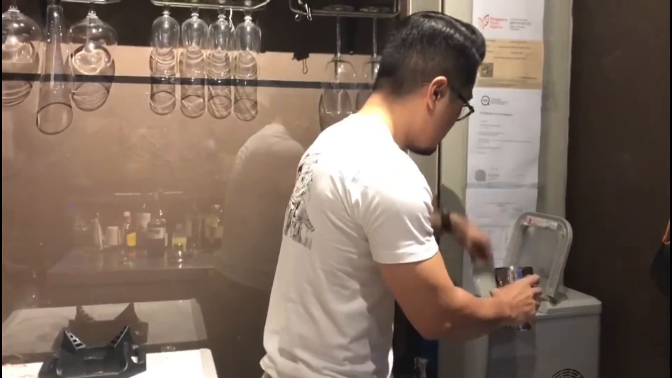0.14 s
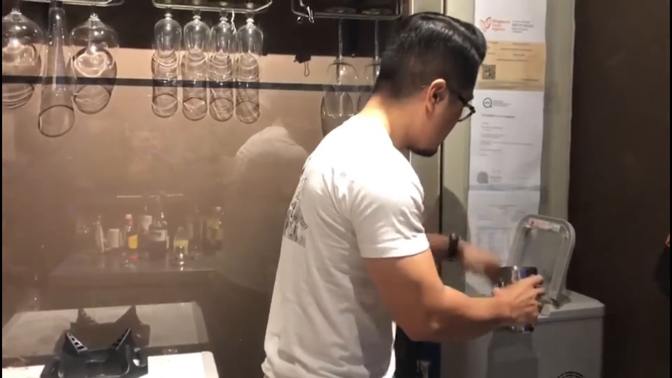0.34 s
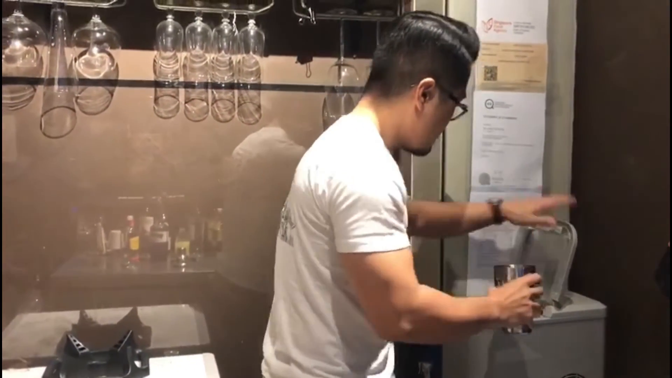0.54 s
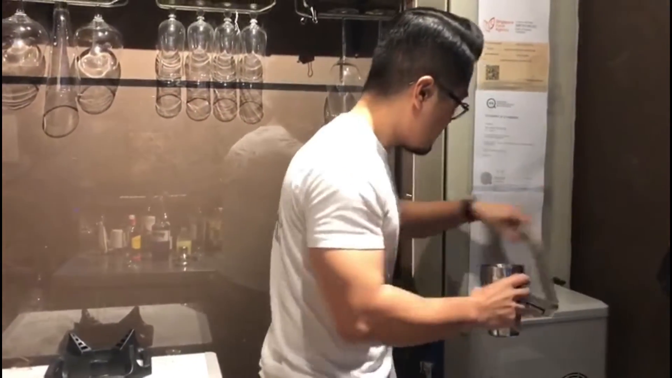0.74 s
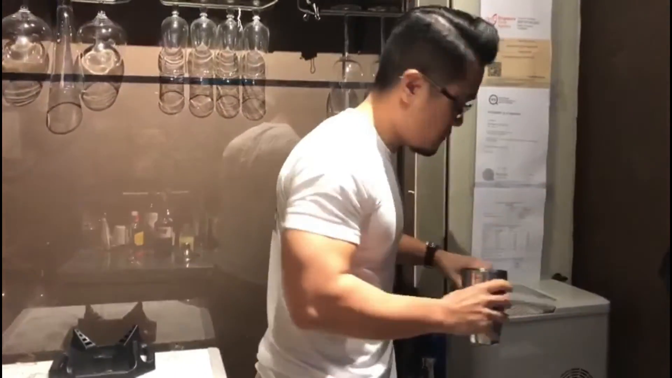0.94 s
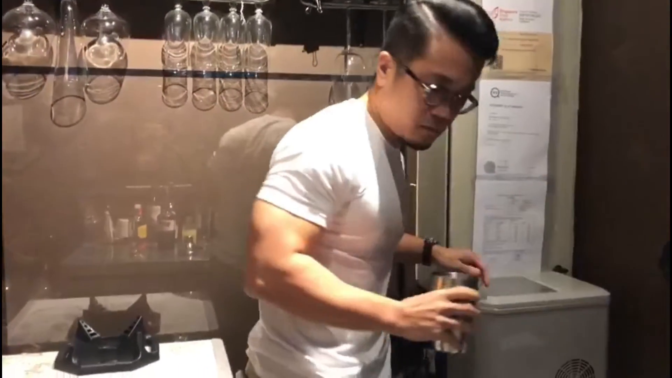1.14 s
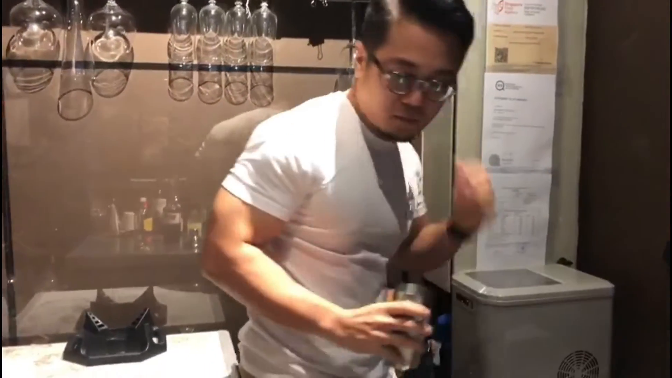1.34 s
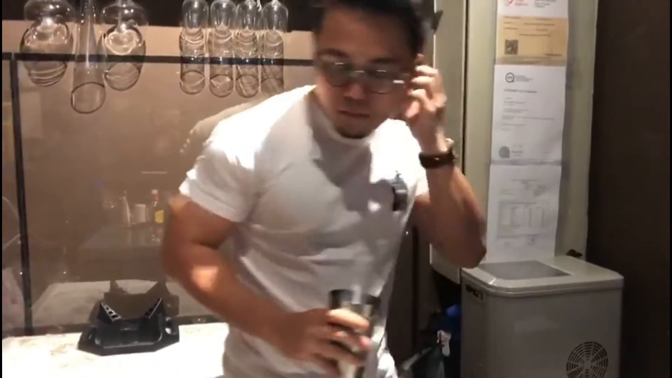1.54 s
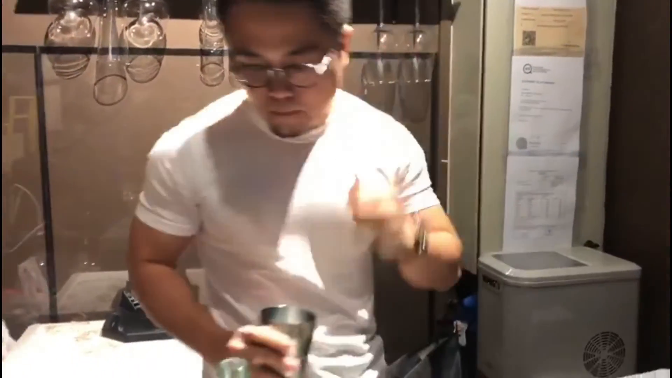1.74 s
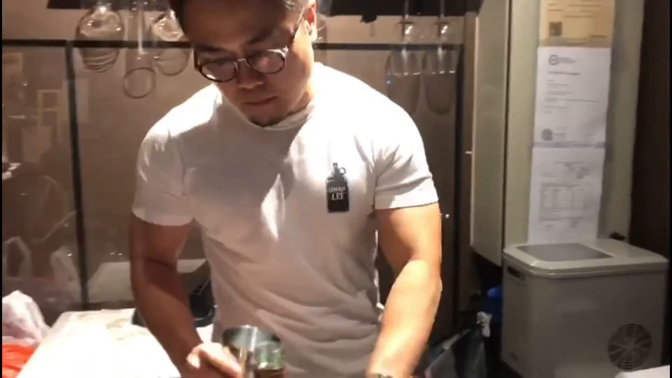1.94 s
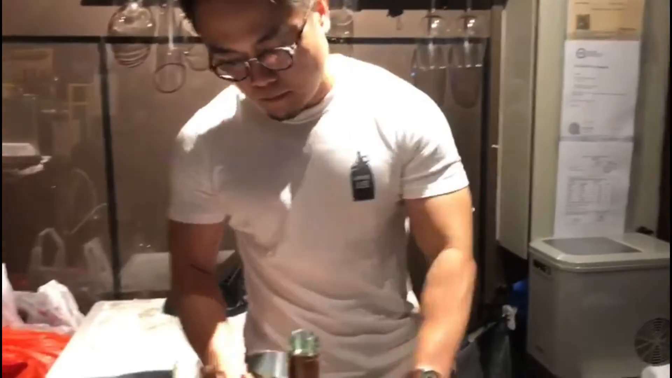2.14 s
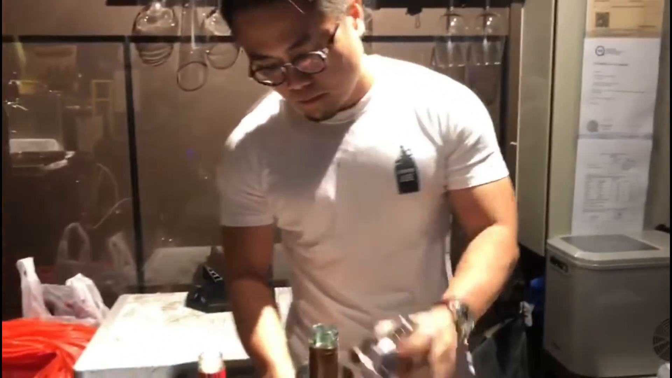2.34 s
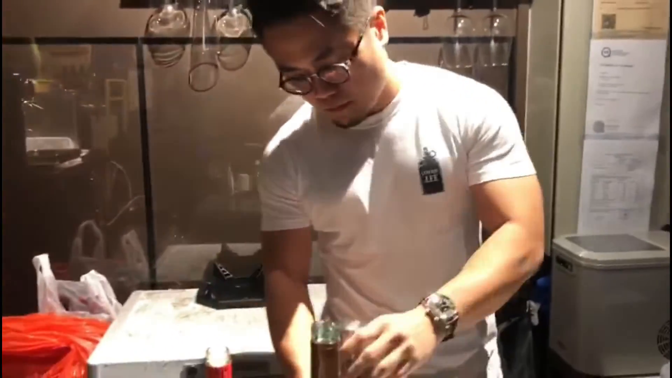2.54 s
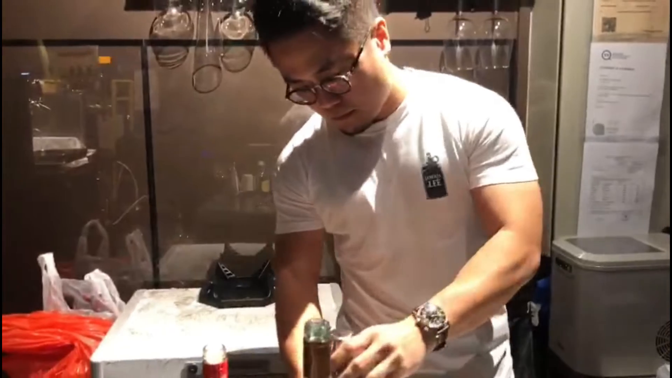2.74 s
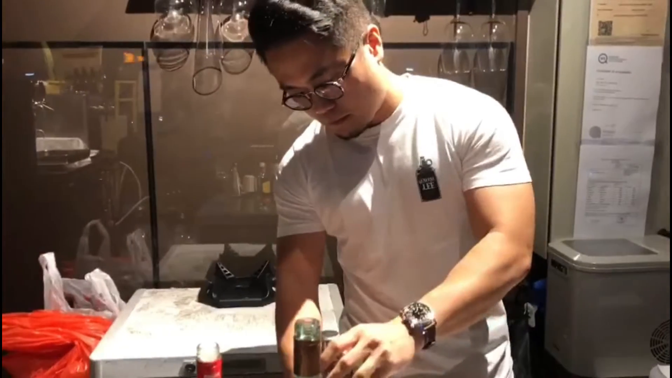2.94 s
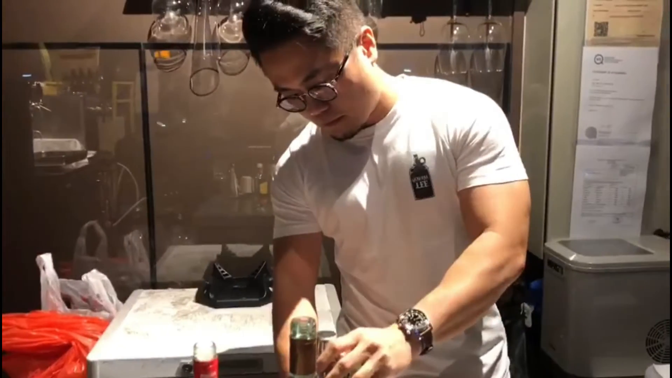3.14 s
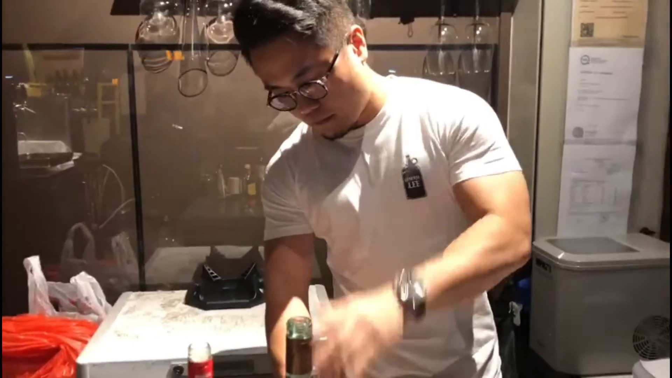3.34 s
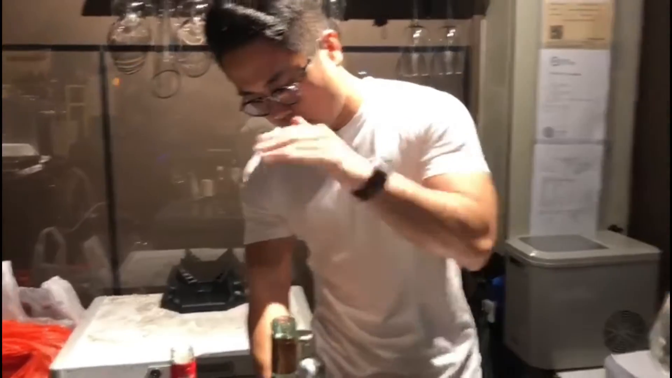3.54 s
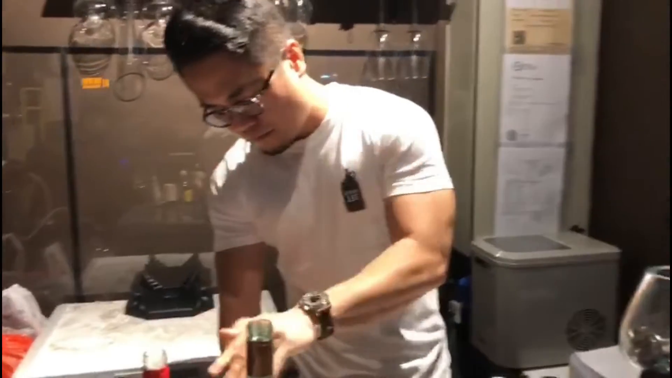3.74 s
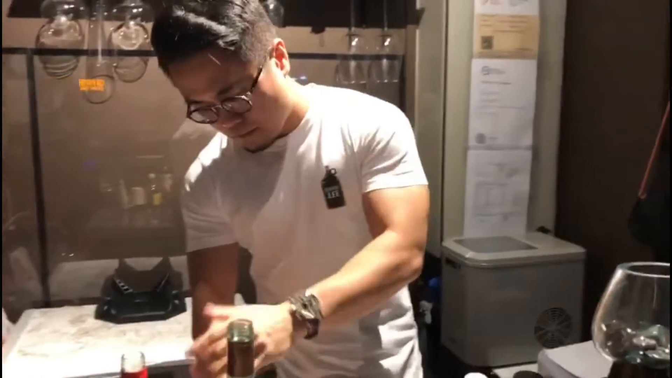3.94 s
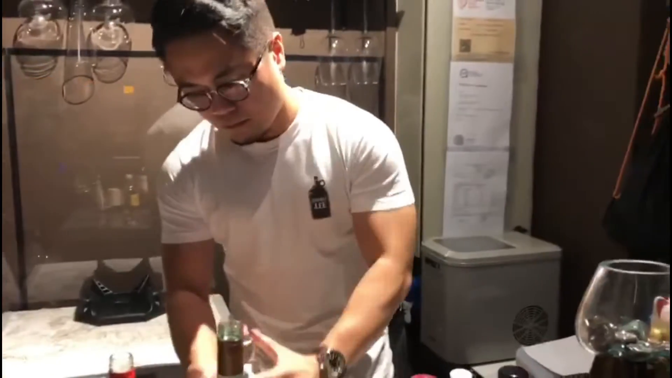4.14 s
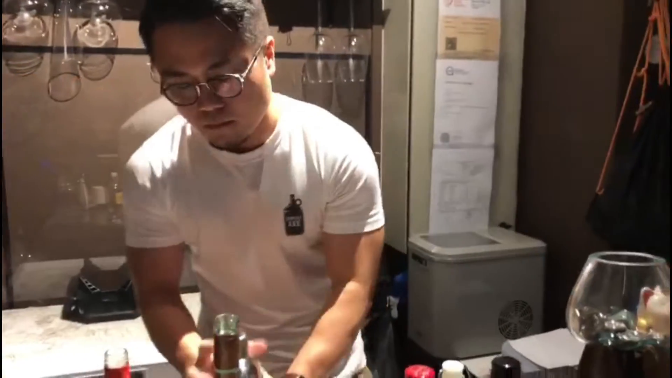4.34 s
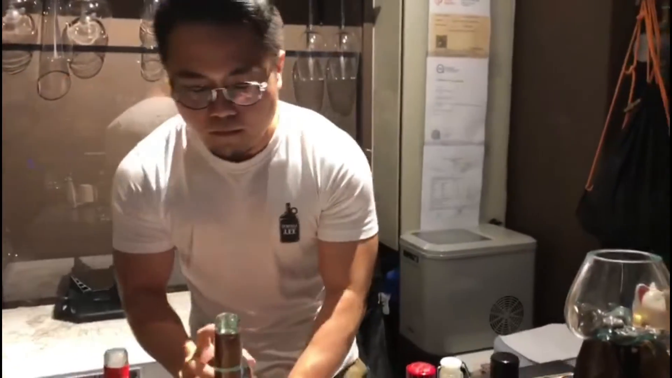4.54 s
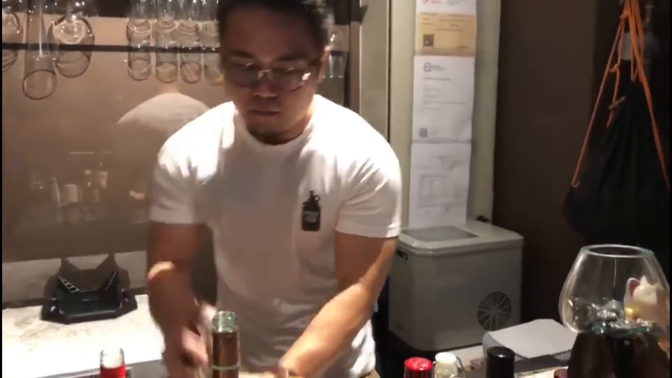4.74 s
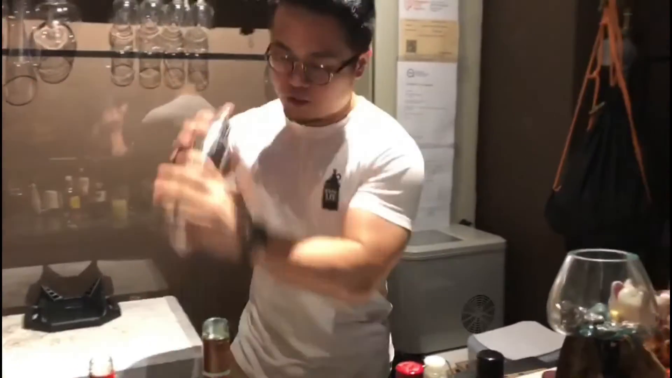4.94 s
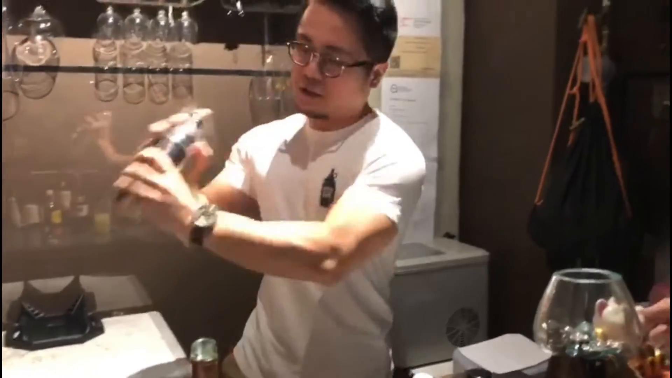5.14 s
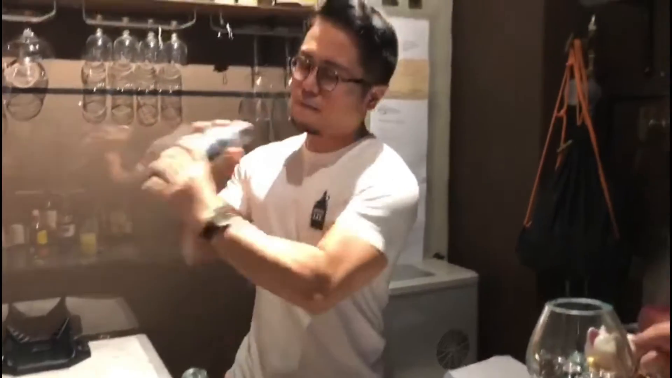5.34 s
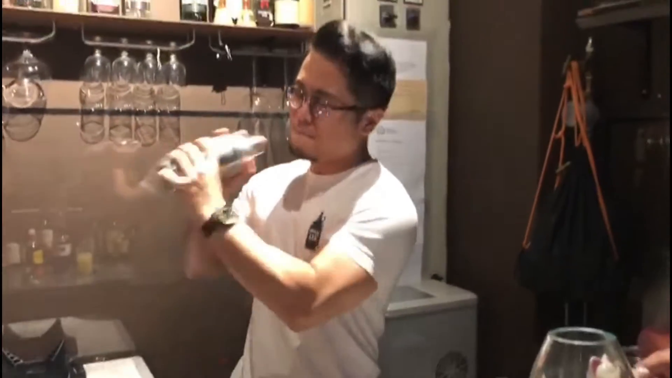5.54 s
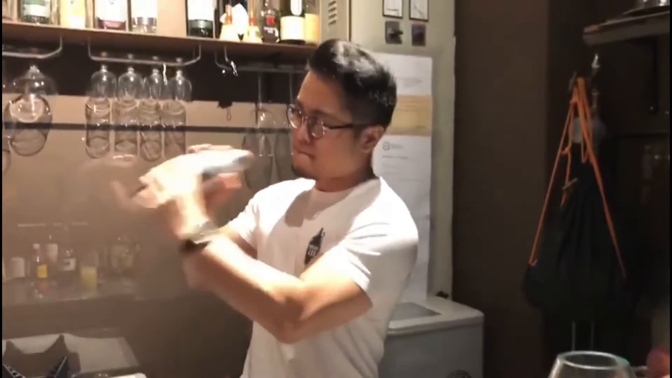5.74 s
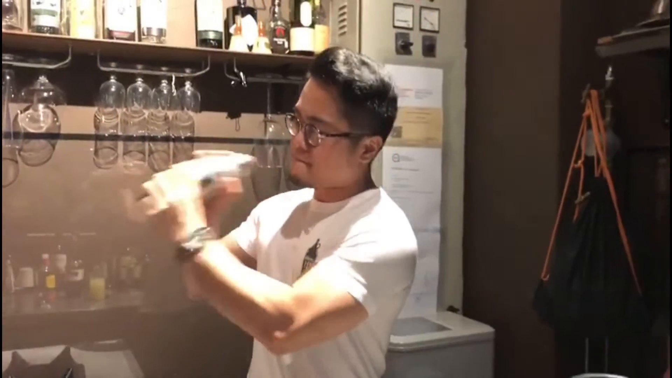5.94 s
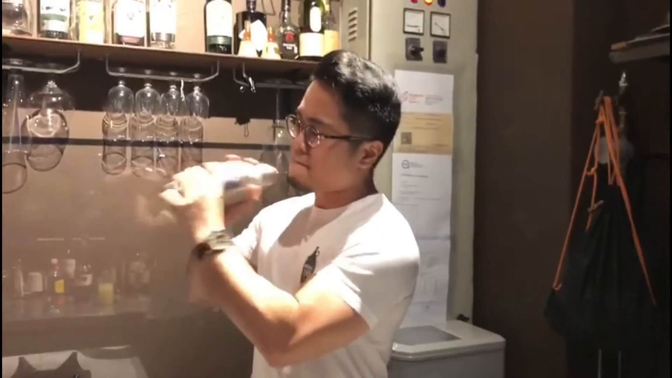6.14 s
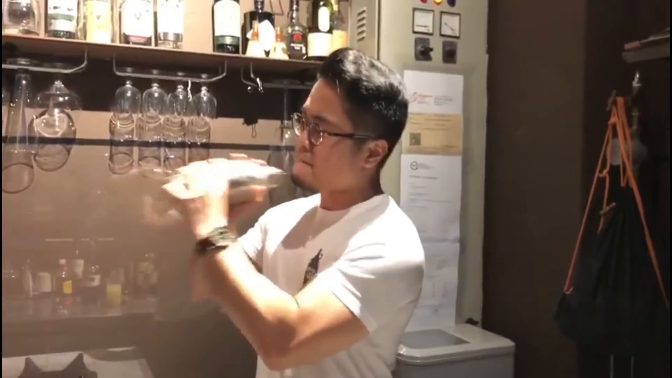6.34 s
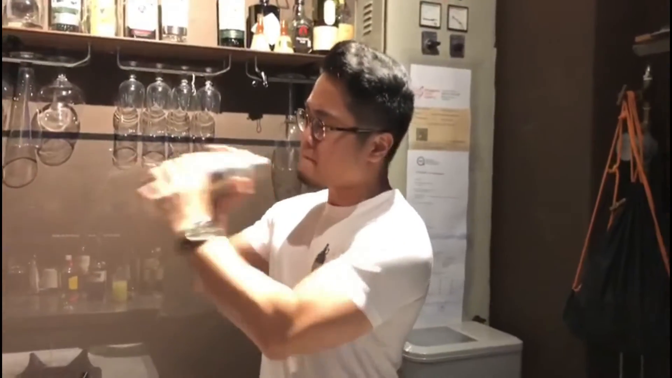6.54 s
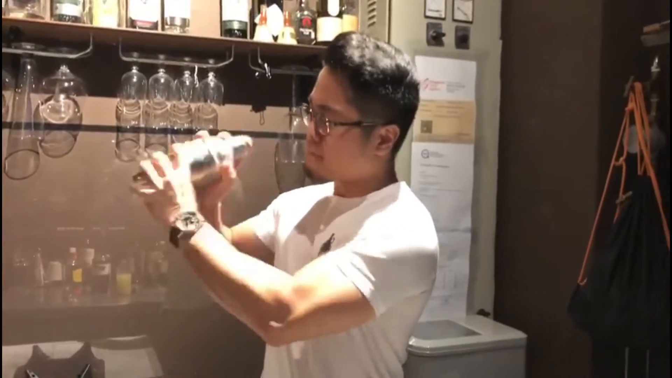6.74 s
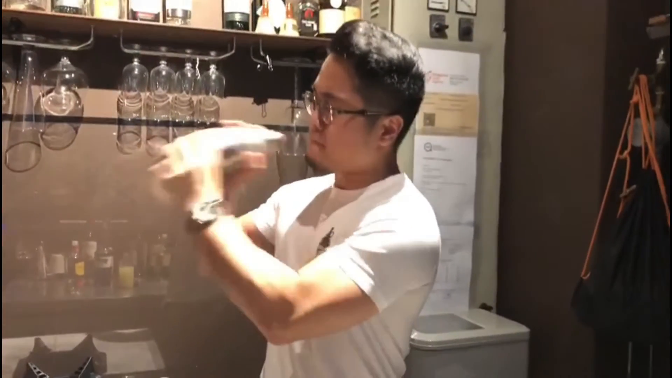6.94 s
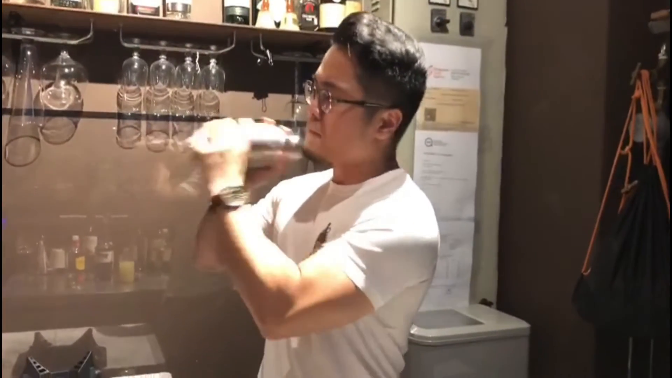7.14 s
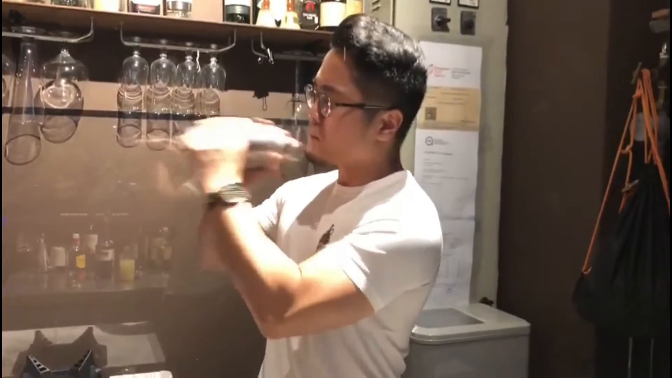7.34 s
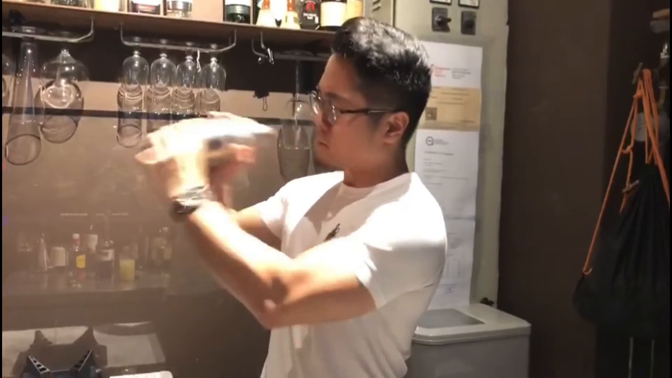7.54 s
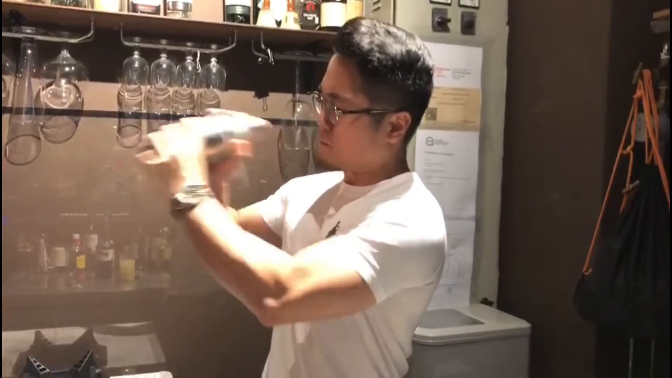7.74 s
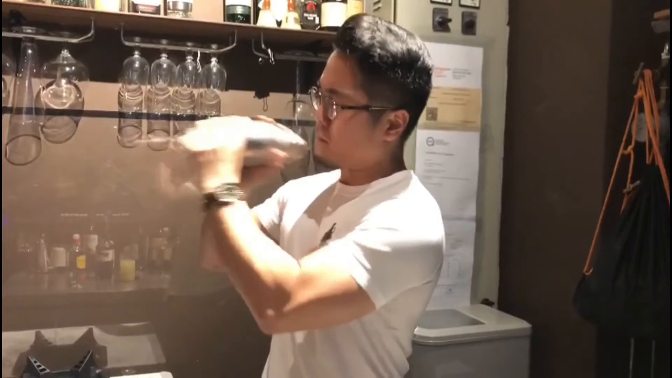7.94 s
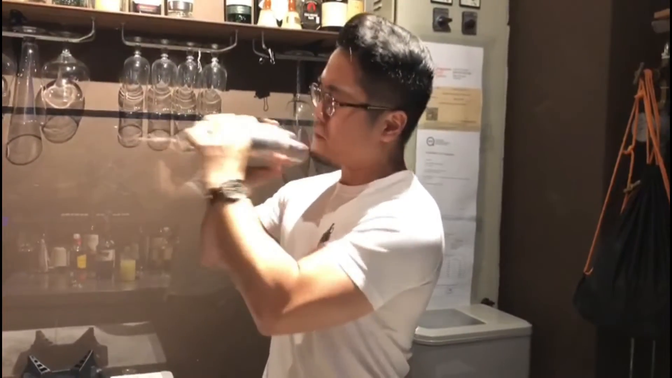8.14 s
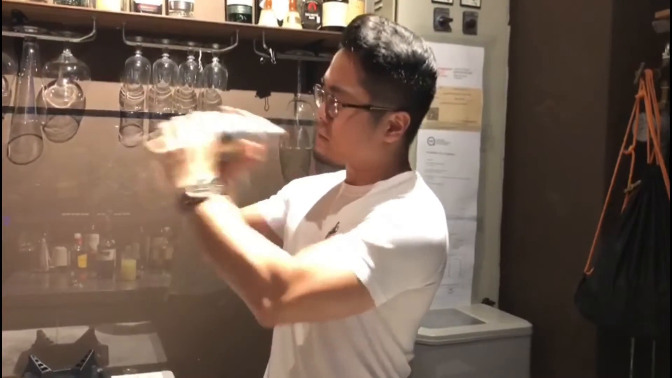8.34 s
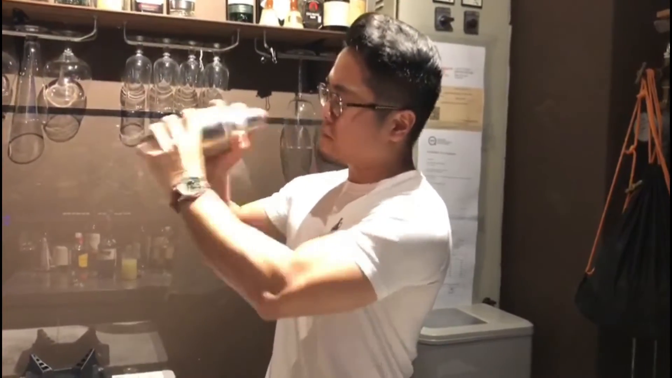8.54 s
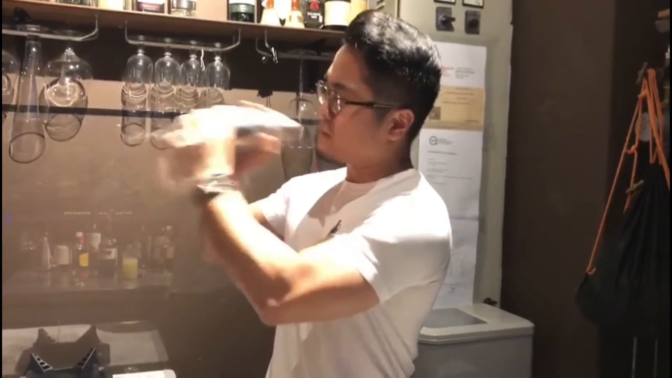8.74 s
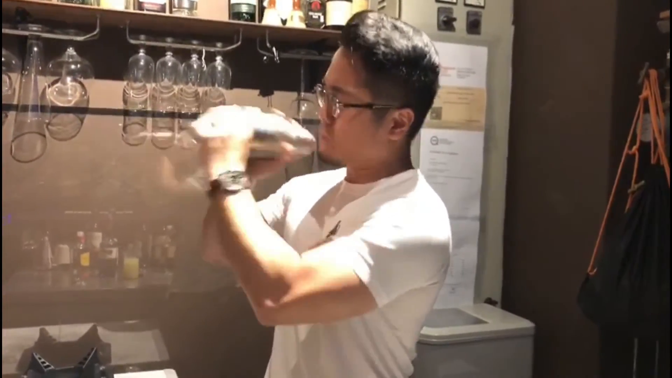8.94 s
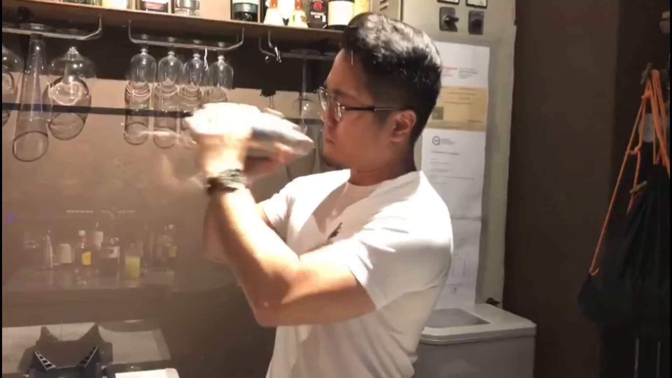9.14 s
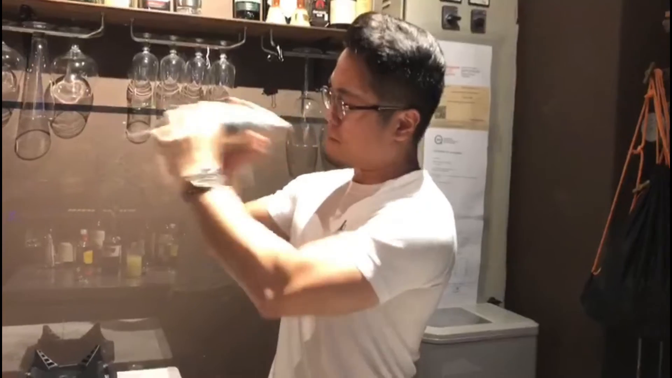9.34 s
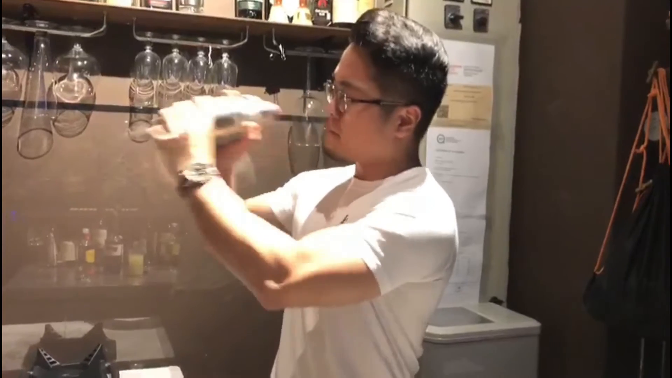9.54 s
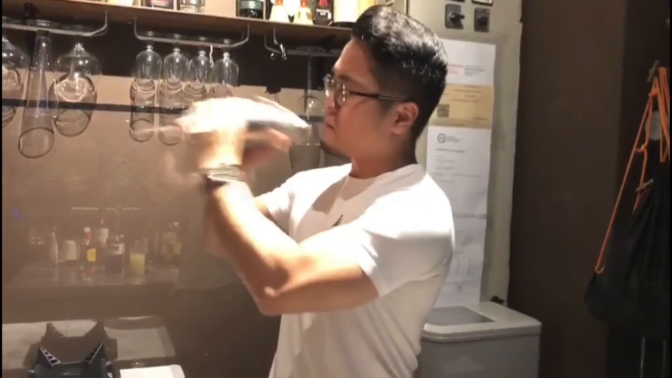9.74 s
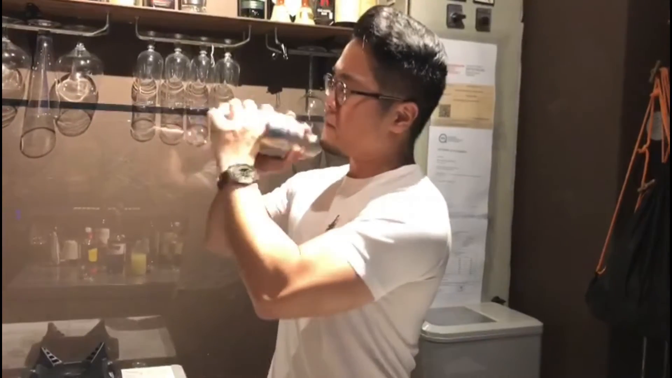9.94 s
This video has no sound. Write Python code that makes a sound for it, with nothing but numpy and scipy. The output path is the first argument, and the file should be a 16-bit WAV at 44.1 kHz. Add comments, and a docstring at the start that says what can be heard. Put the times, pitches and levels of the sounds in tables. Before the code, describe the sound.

Refrigerators and fans hum steadily in a small bar. Close by, ice rattles as a scoop falls into an ice maker, whose lid then bangs shut. Hands rub and knock quietly at the counter, a cap clacks onto a metal shaker, and a slap closes it with a thump. The shaker is then shaken vigorously, the ice making a bright, rapid, rhythmic rattle until the end.

```python
"""A small bar; refrigerators hum throughout and the room answers each blow.
An ice scoop drops back among the cubes of an ice maker (0.3 s) and the lid slams (1.0 s).
Hands brush and knock about; a steel shaker is capped (2.6 s), slapped shut (3.7 s) and tipped,
so that the ice slides (4.5 s). From 5.1 s it is shaken hard: about twelve times a second
the ice crashes against one end and tumbles after."""
import sys
import numpy as np
from scipy import signal
from scipy.io import wavfile
from scipy.ndimage import uniform_filter1d

SR = 44100
rng = np.random.default_rng(int(sys.argv[2]) if len(sys.argv) > 2 else 0)


def dump_mix(stems):
    """Bounce the given channels to the path in sys.argv[1] as a 16-bit WAV at rate SR."""
    frames = np.atleast_2d(stems).T  # one column per channel
    limited = np.clip(frames, -1, 1)  # hard clip at full scale
    pcm = np.round(limited * 32767).astype(np.int16)
    wavfile.write(sys.argv[1], SR, pcm)


N = 440118


def gain_of(db):
    return 10 ** (np.asarray(db) / 20)


def unit_rms(x):
    return x / np.sqrt(np.mean(x ** 2) + 1e-20)


def value_at(points, hz):
    """Interpolate (f/Hz, value) rows over log frequency."""
    points_hz, values = np.transpose(points)
    return np.interp(np.log(hz + 1), np.log(points_hz + 1), values)


def add(mix, start_s, sound):
    part = mix[max(round(start_s * SR), 0):][:len(sound)]
    part += sound[:len(part)]


def unroll(rows):
    """Start time and the columns of a curve, sample by sample."""
    times_s, *columns = np.transpose(rows)
    t = np.arange(times_s[0], times_s[-1], 1 / SR)
    return times_s[0], [np.interp(t, times_s, column) for column in columns]


def colour(x, spectrum):
    """Minimum-phase filter of unit energy from (f/Hz, level/dB) rows."""
    hz = abs(np.fft.fftfreq(4096, 1 / SR))
    log_gain = np.log(gain_of(np.maximum(value_at(spectrum, hz), -100)))
    taps = np.fft.ifft(np.exp(np.conj(signal.hilbert(log_gain)))).real[:2048]
    return signal.oaconvolve(x, taps / np.linalg.norm(taps))[:len(x)]


def resonate(x, hz, *widths_hz):
    """One resonator per width, in series; each alone keeps the power of white noise."""
    for width_hz in widths_hz:
        r = np.exp(-np.pi * width_hz / SR)
        feedback = [1, -(1 + r * r) * np.cos(2 * np.pi * hz / SR), r * r]
        x = signal.lfilter([1, 0, -1], feedback, x) * np.sqrt((1 - r * r) / 2)
    return x


def ring(x, modes):
    """Parallel resonators of alternating sign."""
    return sum((-1) ** k * gain_of(db) * resonate(x, hz, width_hz)
               for k, (hz, width_hz, db) in enumerate(modes))


def ticks(size, per_s, spread_db=3):
    """Random contacts of uneven strength, mean power 1."""
    strength = gain_of(spread_db * np.minimum(rng.exponential(1, size), 4))
    sign = rng.choice([-1., 1.], size)
    return unit_rms(strength * sign * (rng.random(size) < per_s / SR))


def struck(modes):
    """Dying sines after one blow, peak 1."""
    t = np.arange(SR // 2) / SR
    x = sum(gain_of(db - 60 * t / t60_s) * np.sin(2 * np.pi * hz * t) for hz, db, t60_s in modes)
    return x / abs(x).max()


def tilt(x, db):
    """Raise the band above 2500 Hz by db and lower the band below by as much."""
    low = signal.lfilter(*signal.butter(1, 2500, fs=SR), x)
    return low * gain_of(-db) + (x - low) * gain_of(db)


def blow(hit, spectrum, modes):
    """A burst of contact noise; quick rebounds ring the body, which builds over milliseconds."""
    start_s, crack_db, t60_s, body_db = hit
    out, t = np.zeros(N), np.arange(SR // 2) / SR
    crack = colour(rng.standard_normal(len(t)) * gain_of(crack_db - 60 * t / t60_s), spectrum)
    rebounds = .08 * ticks(len(t), per_s=400, spread_db=2.5) * gain_of(-60 * t / (2 * t60_s))
    rebounds[0] = 1  # first contact
    body = signal.oaconvolve(struck(modes), rebounds)[:len(t)] * (1 - np.exp(-t / .003))
    add(out, start_s, crack + gain_of(body_db) * body / abs(body).max())
    return out


def room(x):
    """Six sparse tails, crossfaded continuously to avoid ringing tones; decay varies by band."""
    # reverberation: f/Hz, t60/s
    decay = [(100, .45), (400, .4), (1500, .36), (5000, .37), (9000, .42), (12000, .36)]
    out = np.zeros(N)
    crossfade_rad = 2 * np.pi * 6.1 * np.arange(N) / SR
    for k in range(6):
        echoes = np.zeros(SR // 2)
        slots = np.arange(130, len(echoes) - 10, 10)
        echoes[slots + rng.integers(0, 10, len(slots))] = rng.choice([-1., 1.], len(slots))
        hz, t, bands = signal.stft(echoes, SR, nperseg=256)
        fade = gain_of(-60 * t / value_at(decay, hz)[:, None])
        tail = signal.istft(bands * fade, SR, nperseg=256)[1]
        share = np.sqrt(2 / 6) * np.cos(crossfade_rad + k * np.pi / 6)
        out += signal.oaconvolve(x * share, tail / np.linalg.norm(tail))[:N]
    return out


def fans():
    """Steady air noise with drifting spectral patches; its level drops during the shaking."""
    # air spectrum: f/Hz, relative level/dB
    spectrum = [(30, -36), (50, -15), (80, -3), (125, -5), (200, -8), (280, -4), (450, -10), (1000, -16),
                (2500, -25), (4000, -31), (6300, -34), (11000, -40), (12000, -50)]
    # background level: t/s, level/dB
    background = [(0, -42), (4.6, -42.5), (7.2, -43.5), (8, -47), (9.98, -47)]
    frames, hz = N // 512 + 5, np.fft.rfftfreq(2048, 1 / SR)
    real, imag, patches = rng.standard_normal((frames, len(hz), 3)).T
    drift_db = 1.2 * unit_rms(uniform_filter1d(uniform_filter1d(patches, 20, axis=0), 8, axis=1))
    bands = (real + 1j * imag) * gain_of(value_at(spectrum, hz)[:, None] + drift_db)
    air = signal.istft(bands, nperseg=2048, noverlap=1536)[1][:N]
    level_db = np.interp(np.arange(N) / SR, *np.transpose(background))
    return gain_of(level_db) * unit_rms(air)


def refrigerators():
    """Wavering hum lines, a low throb and a faint thin whine."""
    # hum lines: f/Hz, width/Hz, level/dB
    hum = [(100, 12, -42), (152, 14, -53), (260, 14, -54), (298, 10, -52), (396, 14, -57)]
    # throb: t/s, level/dB
    throb = [(0, -56), (.9, -58), (1.3, -52), (1.92, -43), (2.42, -51), (3.22, -44), (3.7, -52), (4.2, -56),
             (4.86, -49), (5.6, -57), (7, -54), (8.5, -52), (9.2, -57), (9.98, -58)]
    # whine: t/s, f/Hz, level/dB
    whine = [(2.8, 8350, -84), (3.3, 8600, -80), (3.7, 8900, -79)]
    out = ring(rng.standard_normal(N), hum)
    start_s, (db,) = unroll(throb)
    low_noise = resonate(rng.standard_normal(N)[:len(db)], 57, 9, 9)
    add(out, start_s, gain_of(db) * unit_rms(low_noise))
    start_s, (hz, db) = unroll(whine)
    waver = 1 + .6 * unit_rms(uniform_filter1d(rng.standard_normal(SR), size=900))[:len(db)]
    add(out, start_s, gain_of(db) * waver * np.sin(2 * np.pi * np.cumsum(hz) / SR))
    return out


def handling():
    """Hands, cloth and tins brush softly; dull knocks on the counter."""
    # one curve per brush: t/s, relative level/dB, tilt/dB
    brushes = [
        [(1.46, -53, -2.6), (1.496, -58, -2.6), (1.516, -49, -2.6), (1.598, -54, -2.6), (1.62, -52, -2.6)],
        [(1.95, -63, -2.6), (1.956, -55, -2.6), (1.994, -59, -2.6), (2.044, -47, -2.6), (2.112, -49, -2.6),
         (2.166, -42, -2.6), (2.344, -62, -2.6), (2.35, -57, -2.6)],
        [(4.04, -65, -2.6), (4.05, -65, -2.6), (4.08, -48, -2.6), (4.104, -50, -2.6), (4.16, -65, -2.6)],
        [(4.4, -54, -2.6), (4.436, -60, -2.6), (4.446, -47, -2.6), (4.464, -58, -2.6), (4.482, -48, -2.6),
         (4.678, -54, -2.6), (4.758, -50, -2.6), (4.8, -54, -2.6)],
    ]
    # counter knocks: t/s, peak/dB, f/Hz
    knocks = [(2.159, -29, 380), (4.089, -33, 380), (4.499, -35, 380)]
    out = np.zeros(N)
    highpass = signal.butter(1, 700, "high", fs=SR)
    for curve in brushes:
        start_s, (db, tilt_db) = unroll(curve)
        rub = signal.lfilter(*highpass, ticks(SR, per_s=6000, spread_db=2.5)[:len(db)])
        add(out, start_s, gain_of(db - 3) * tilt(rub, tilt_db) * signal.windows.tukey(len(db), .2))
    for start_s, db, hz in knocks:
        add(out, start_s, gain_of(db) * struck([(hz, -.5, .12), (1.5 * hz, -5, .08)]))
    return out


def scoop_and_cubes():
    """Loose cubes rattle in the plastic bin and knock the scoop; a few clink in the open shaker."""
    # one curve per rattle: t/s, relative level/dB, tilt/dB
    rattles = [
        [(0.0, -32, 0.1), (0.114, -44, 0.1), (0.12, -48, 0.1), (0.25, -60, 0.1)],
        [(0.336, -28, 0.1), (0.342, -22, 0.1), (0.384, -15, 0.1), (0.41, -22, 0.1), (0.76, -42, 0.1),
         (0.876, -53, 0.1), (0.88, -60, 0.1)],
    ]
    # bin spectrum: f/Hz, relative level/dB
    bin_spectrum = [(88, -45), (150, -15), (423, 0), (464, 0), (870, -8), (972, -4), (1760, -11),
                    (3550, -11), (11000, -18), (11800, -18), (12500, -61), (16200, -91), (22000, -120)]
    # scoop and open shaker: f/Hz, relative level/dB, t60/s
    scoop_modes = [(340, -10, .1), (440, -4, .1), (580, -10, .1), (970, -.5, .16), (1260, -9, .15),
                   (1432, -8, .1), (1880, -12, .12), (3530, -10, .2), (4450, -15, .1), (6700, -17, .15)]
    tin_modes = [(1000, -4, .12), (2400, -.5, .1), (2520, -3, .08), (7200, -14, .08)]
    # hits on each: t/s, peak/dB
    scoop_knocks = [(.339, -11), (.368, -15), (.382, -12), (.449, -23), (.525, -21), (.599, -31),
                    (.719, -36)]
    tin_clinks = [(.002, -33), (.024, -30), (.11, -42)]
    out = np.zeros(N)
    scoop_bands = [(hz, 4 / t60_s, db) for hz, db, t60_s in scoop_modes]
    for curve in rattles:
        start_s, (db, tilt_db) = unroll(curve)
        hits = ticks(SR, per_s=2000)[:len(db)]
        plastic = tilt(colour(hits, bin_spectrum), tilt_db)
        scoop = gain_of(-12) * unit_rms(ring(hits, scoop_bands))
        add(out, start_s, gain_of(db - 6) * (plastic + scoop))
    for start_s, db in scoop_knocks:
        add(out, start_s, gain_of(db) * struck(scoop_modes))
    for start_s, db in tin_clinks:
        add(out, start_s, gain_of(db) * struck(tin_modes))
    return out


def lid_slam():
    """The ice maker's lid falls shut and booms."""
    # slam: t/s, crack/dB, crack t60/s, body peak/dB
    hit = (1.0395, -12.5, .08, -12)
    # crack spectrum: f/Hz, relative level/dB
    spectrum = [(60, -12), (150, -3), (400, -2.5), (800, -7), (1500, -10), (3000, -13), (6000, -15),
                (11000, -16), (12500, -28)]
    # lid modes: f/Hz, relative level/dB, t60/s
    modes = [(86, -2.5, .3), (151, -.5, .3), (215, -12, .15), (295, -5, .18), (377, -2.5, .18),
             (590, -12, .1), (840, -14, .08)]
    return blow(hit, spectrum, modes)


def capping():
    """The cap meets the shaker and the steel rings briefly."""
    # contact: t/s, crack/dB, crack t60/s, body peak/dB
    hit = (2.6255, -18, .045, -16)
    # crack spectrum: f/Hz, relative level/dB
    spectrum = [(150, -14), (350, -7), (750, -1), (1500, -7), (2200, -9), (3300, -5), (5000, -14),
                (8000, -20), (11000, -22), (12500, -32)]
    # steel modes: f/Hz, relative level/dB, t60/s
    modes = [(355, -9, .12), (651, -3, .12), (754, -1, .15), (1513, -18, .06), (2552, -16, .06),
             (3230, -10, .1), (3330, -9, .15), (4091, -20, .08), (5459, -22, .1), (7850, -24, .15),
             (10750, -24, .2)]
    return blow(hit, spectrum, modes)


def slap():
    """A slap shuts the shaker with a low thump."""
    # slap: t/s, crack/dB, crack t60/s, body peak/dB
    hit = (3.7035, -16, .1, -10.5)
    # crack spectrum: f/Hz, relative level/dB
    spectrum = [(80, -10), (225, -1), (400, -1), (950, -10), (1700, -9), (2600, -13), (3600, -21),
                (5500, -18), (9100, -9), (11500, -17), (12500, -30)]
    # thump modes: f/Hz, relative level/dB, t60/s
    modes = [(105, -8, .22), (152, -1, .25), (225, -.5, .22), (290, -2.5, .2), (345, -2.5, .2),
             (393, -3, .18), (533, -14, .1), (700, -18, .06)]
    return blow(hit, spectrum, modes)


def ice_slide():
    """Cubes scrape along the steel wall as the shaker is tipped."""
    # scrape: t/s, relative level/dB
    loudness = [(4.5, -54), (4.69, -58), (4.73, -54), (4.894, -54), (4.996, -40), (5.062, -41),
                (5.084, -29), (5.09, -32)]
    # wall resonances: f/Hz, width/Hz, relative level/dB
    wall_modes = [(2600, 200, -9), (3100, 350, -.5), (3700, 500, -4), (5500, 500, -5), (6200, 500, -6),
                  (7300, 500, -10)]
    out = np.zeros(N)
    start_s, (db,) = unroll(loudness)
    scrape = unit_rms(ring(ticks(SR, per_s=1500), wall_modes))
    add(out, start_s, gain_of(db - 5) * scrape[:len(db)])
    return out


def shaking():
    """Each stroke is a crack and a shower of cubes; where they land sets the mix of base and wall."""
    # ice reaching an end: t/s, crack/dB, base/Hz, base/dB, wall/Hz, wall/dB, chips/dB, thud/dB
    strokes = [(5.0803, -14, 1780, -31, 3290, -29, -30, -38), (5.1072, -5, 1810, -20, 3530, -20, -26, -32),
               (5.18, -30, 1540, -22, 3440, -23, -32, -36), (5.2743, -8, 2330, -24, 3270, -20, -25, -32),
               (5.3118, -27, 2070, -26, 3360, -28, -29, -46), (5.3577, -5, 1940, -17, 3270, -21, -28, -32),
               (5.4335, -6, 2270, -24, 2980, -27, -25, -39), (5.46, -21, 2100, -26, 3020, -25, -29, -37),
               (5.5253, -25, 1980, -26, 3420, -26, -30, -34), (5.6026, -8, 2220, -24, 3430, -19, -23, -36),
               (5.6859, -27, 2050, -25, 3150, -26, -32, -33), (5.7577, -10, 2140, -21, 3170, -18, -26, -36),
               (5.8665, -21, 1810, -27, 3070, -25, -31, -41), (5.9358, -9, 1920, -26, 3590, -18, -23, -35),
               (6.0206, -14, 1650, -23, 3360, -20, -28, -34), (6.0925, -17, 1660, -33, 3340, -24, -32, -39),
               (6.1264, -16, 1650, -31, 3380, -21, -34, -41), (6.1783, -18, 1850, -23, 3090, -23, -27, -35),
               (6.2526, -14, 2390, -30, 3830, -23, -25, -44), (6.2791, -33, 2310, -26, 3880, -24, -29, -42),
               (6.3449, -21, 1970, -24, 3480, -25, -31, -40), (6.4267, -22, 1720, -25, 3260, -22, -26, -34),
               (6.4751, -33, 1580, -32, 3160, -26, -34, -45), (6.5215, -12, 1720, -27, 3470, -21, -26, -39),
               (6.5988, -8, 2160, -23, 3500, -18, -23, -33), (6.6881, -16, 1930, -24, 3290, -20, -28, -30),
               (6.7615, -15, 2010, -23, 3390, -18, -27, -35), (6.8503, -18, 1870, -22, 3690, -24, -27, -38),
               (6.9271, -20, 1900, -28, 3340, -23, -28, -38), (7.0224, -15, 2060, -23, 3110, -25, -27, -36),
               (7.1157, -21, 1950, -29, 3420, -22, -28, -41), (7.196, -17, 1940, -27, 3320, -24, -28, -36),
               (7.2688, -17, 2240, -29, 3060, -24, -21, -35), (7.2953, -17, 2220, -33, 3160, -33, -33, -47),
               (7.35, -33, 2070, -33, 3120, -27, -31, -42), (7.4284, -18, 1870, -26, 3090, -24, -25, -38),
               (7.5143, -19, 1940, -23, 3380, -27, -25, -43), (7.5911, -16, 2320, -30, 3560, -21, -23, -39),
               (7.6764, -19, 1430, -29, 3120, -27, -27, -32), (7.7532, -9, 2110, -31, 3650, -19, -27, -39),
               (7.837, -11, 2020, -26, 4170, -22, -21, -38), (7.9109, -1, 1870, -26, 4100, -19, -25, -31),
               (8.0066, -18, 2340, -29, 3040, -24, -27, -33), (8.087, -8, 2320, -28, 3680, -24, -24, -38),
               (8.1618, -12, 1720, -26, 2920, -28, -29, -40), (8.2177, -23, 2040, -30, 3670, -17, -25, -42),
               (8.3184, -11, 2030, -20, 3800, -23, -22, -34), (8.3913, -20, 2180, -30, 3430, -25, -24, -44),
               (8.4147, -16, 2200, -28, 3450, -21, -32, -41), (8.4766, -23, 1950, -25, 3390, -26, -26, -38),
               (8.5679, -10, 2090, -29, 3030, -20, -24, -37), (8.6497, -16, 2150, -27, 3280, -25, -25, -37),
               (8.742, -5, 2000, -31, 3090, -19, -27, -41), (8.8258, -19, 2020, -26, 3090, -25, -26, -36),
               (8.8896, -20, 1740, -28, 3760, -21, -28, -46), (8.9211, -22, 2110, -31, 3340, -26, -29, -42),
               (8.9939, -12, 1550, -24, 3250, -24, -27, -31), (9.0328, -17, 2000, -33, 3700, -19, -26, -52),
               (9.0742, -26, 1820, -26, 3420, -24, -27, -40), (9.162, -33, 2080, -27, 3360, -26, -27, -39),
               (9.2244, -15, 1880, -24, 3190, -23, -27, -38), (9.2523, -24, 2120, -31, 3300, -24, -28, -37),
               (9.3157, -19, 2090, -26, 3190, -25, -23, -41), (9.392, -17, 1990, -28, 3630, -21, -25, -35),
               (9.4658, -20, 1690, -24, 3570, -26, -28, -38), (9.5037, -22, 1930, -34, 3740, -30, -30, -51),
               (9.5581, -20, 1680, -28, 3400, -23, -26, -41), (9.6454, -14, 2160, -24, 3320, -22, -24, -38),
               (9.7187, -14, 2240, -30, 3130, -20, -24, -48), (9.7532, -22, 2310, -40, 3160, -25, -33, -42),
               (9.8155, -26, 2070, -30, 3690, -26, -26, -38), (9.8998, -10, 1930, -27, 3250, -23, -27, -43)]
    # spectra of ice chips and of a crack on steel: f/Hz, relative level/dB
    chip_spectrum = [(3000, -20), (5200, -1), (7000, -3.5), (10500, -7), (11700, -12), (12500, -25)]
    crack_spectrum = [(500, -20), (1200, -6), (2500, -1), (4500, -1), (8000, -4), (11700, -6), (12500, -20)]
    rise_s, shower_t60_s, crack_t60_s = .006, .25, .006
    body, cracks, chips = np.zeros((3, N))
    t = np.arange(SR // 3) / SR
    shower = (1 - np.exp(-t / rise_s)) * gain_of(-60 * t / shower_t60_s)
    crack_decay = gain_of(-60 * t / crack_t60_s)
    for start_s, crack_db, base_hz, base_db, wall_hz, wall_db, chips_db, thud_db in strokes:
        on_base, on_wall, on_hands, chip_hits = (ticks(len(t), per_s=1800) for _ in range(4))
        base = gain_of(base_db) * unit_rms(resonate(on_base, base_hz, 1200, 2200))
        wall = gain_of(wall_db) * unit_rms(resonate(on_wall, wall_hz, 2000, 4200))
        thud = gain_of(thud_db) * unit_rms(resonate(on_hands, 680, 500, 700))
        add(body, start_s, shower * (base + wall + thud))
        add(chips, start_s, shower * gain_of(chips_db) * chip_hits)
        add(cracks, start_s, crack_decay * gain_of(crack_db) * rng.choice([-.7, .7], len(t)))
    return body + colour(chips, chip_spectrum) + colour(cracks, crack_spectrum)


def scene():
    """Bar work and its reverberation over the machines, mono."""
    direct = shaking() + ice_slide() + handling() + capping() + slap() + scoop_and_cubes() + lid_slam()
    return (direct + gain_of(1.5) * room(direct) + fans() + refrigerators())[None]


def record(dry):
    """The small microphone drops the deepest bass; then the band limit."""
    low_hz, high_hz = 45, 11900
    heard = signal.lfilter(*signal.butter(2, low_hz, "high", fs=SR), dry)
    lowpass = signal.firwin(255, high_hz, window=("kaiser", 8), fs=SR)
    return signal.oaconvolve(heard, lowpass[None], "same")


dry = scene()
out = record(dry)
dump_mix(out)
```